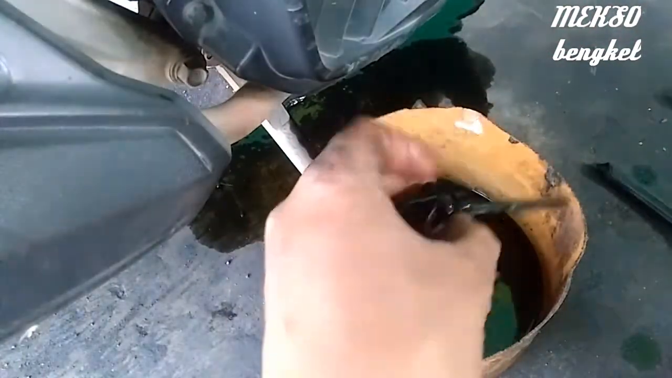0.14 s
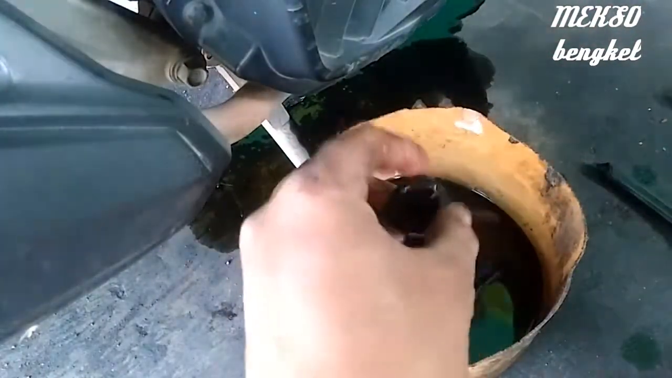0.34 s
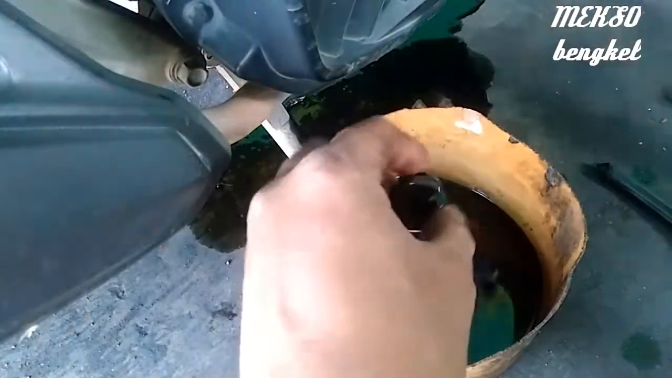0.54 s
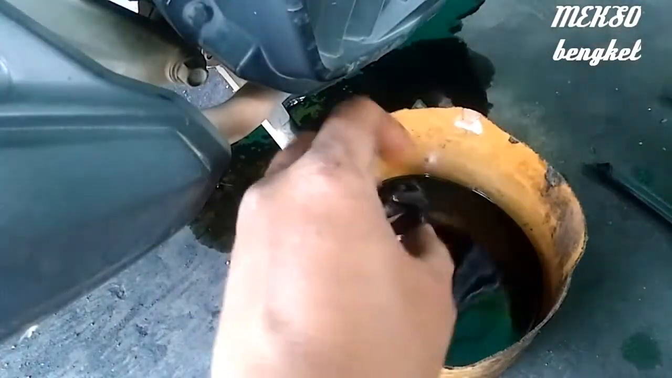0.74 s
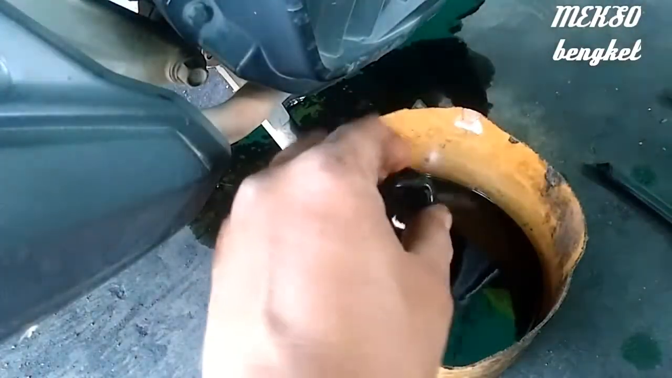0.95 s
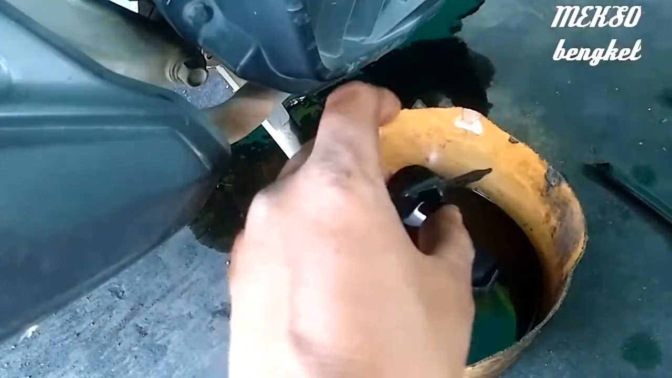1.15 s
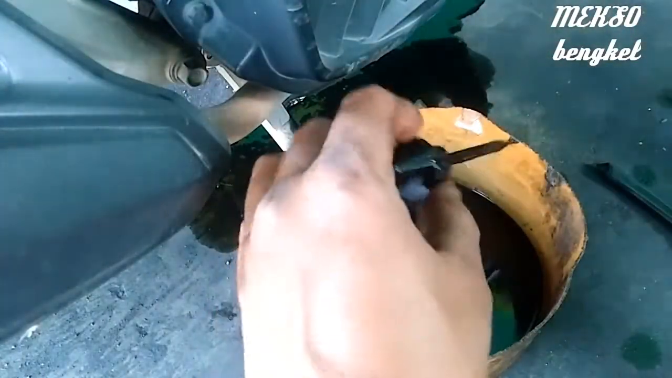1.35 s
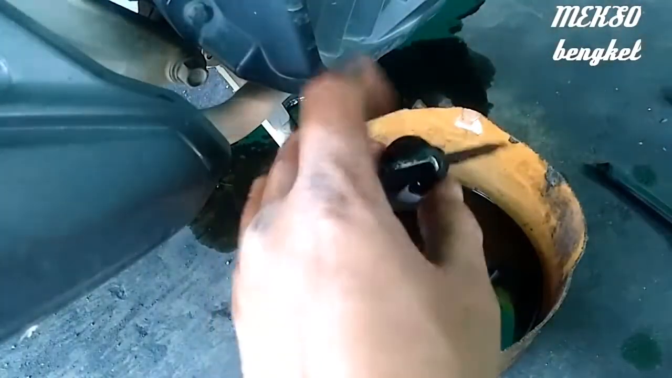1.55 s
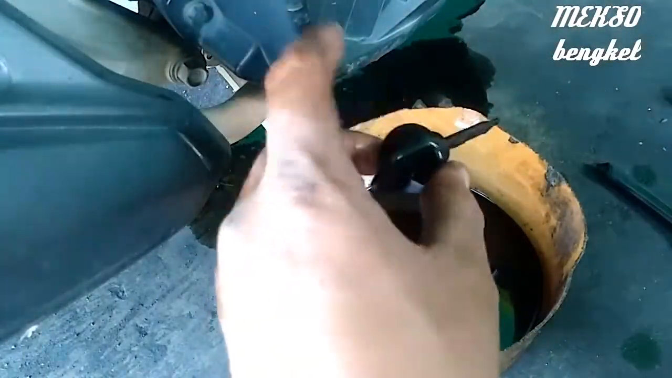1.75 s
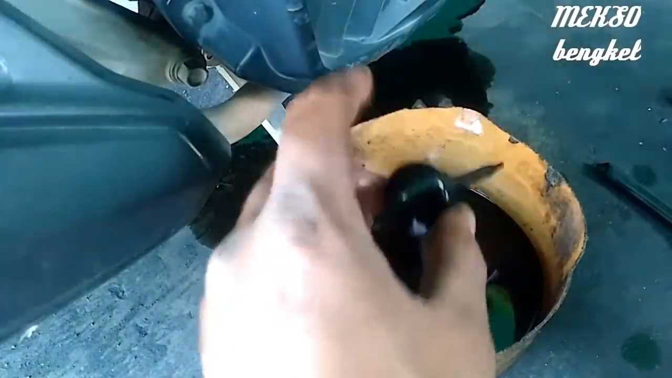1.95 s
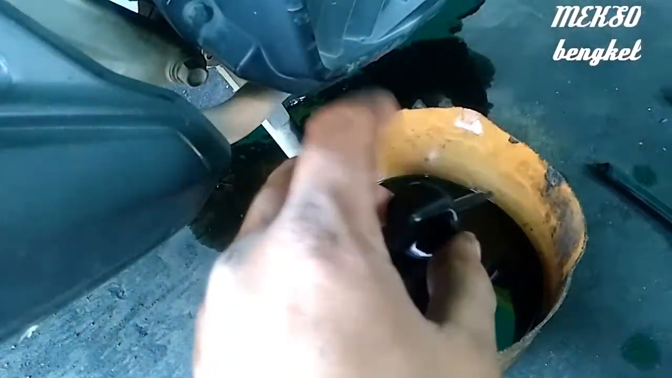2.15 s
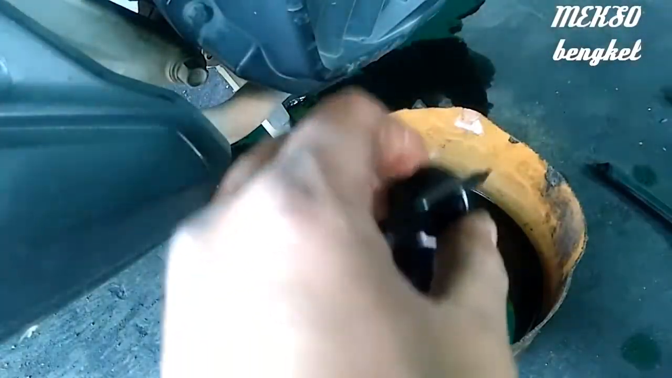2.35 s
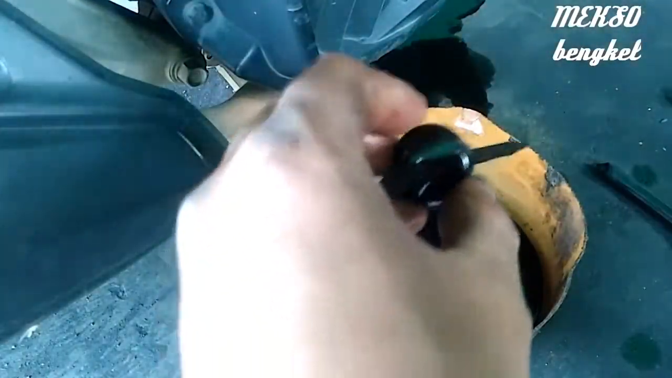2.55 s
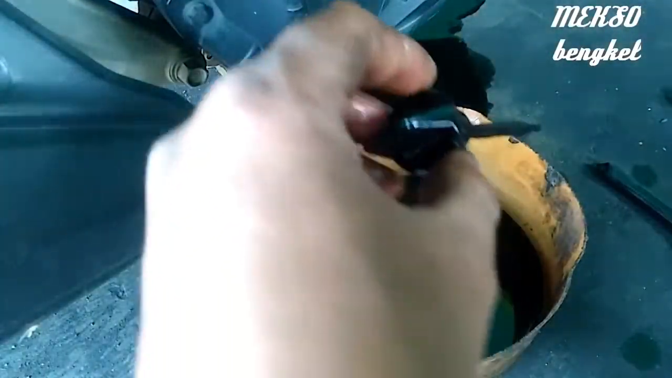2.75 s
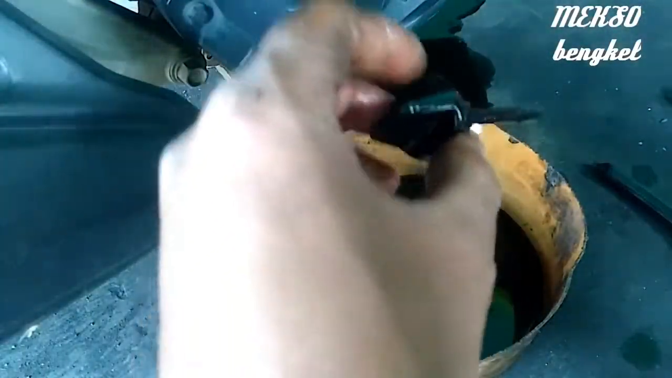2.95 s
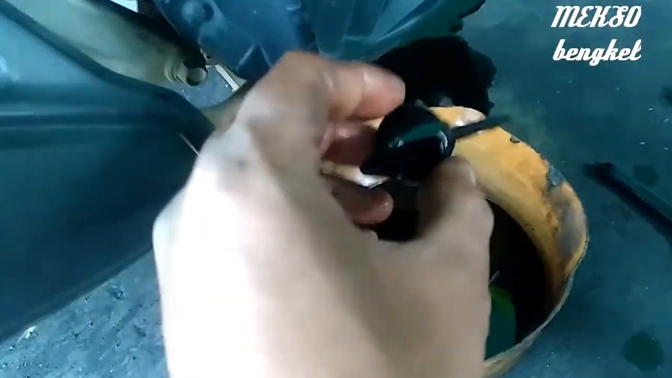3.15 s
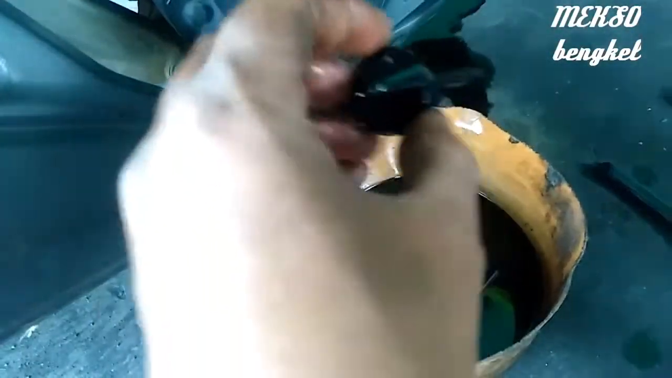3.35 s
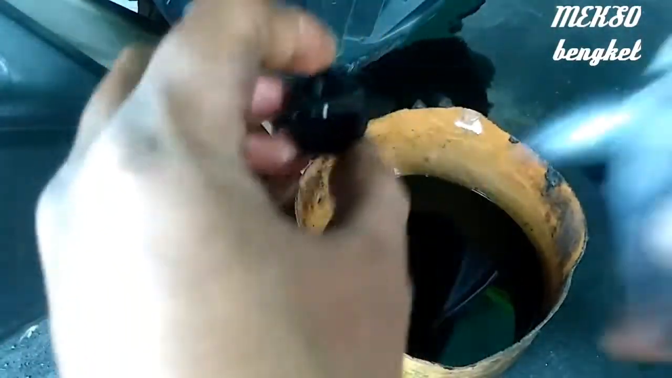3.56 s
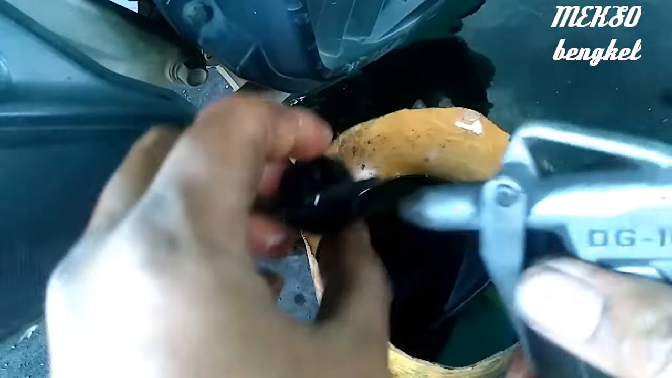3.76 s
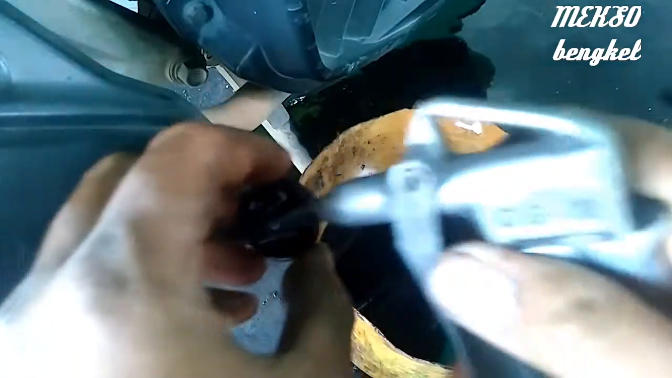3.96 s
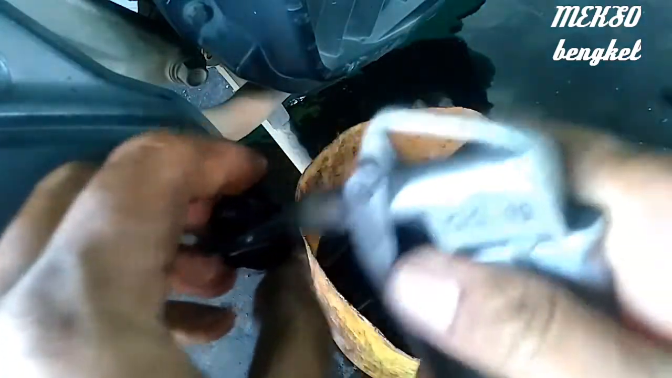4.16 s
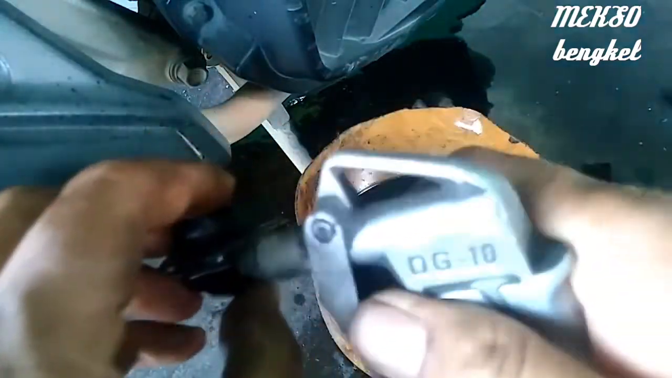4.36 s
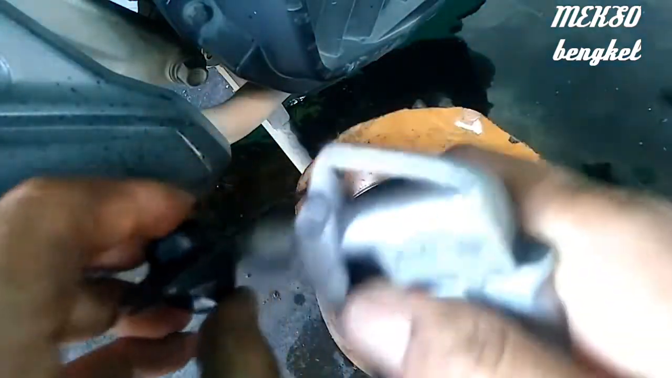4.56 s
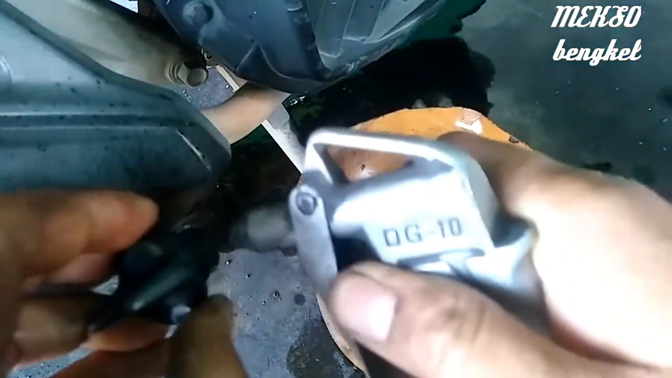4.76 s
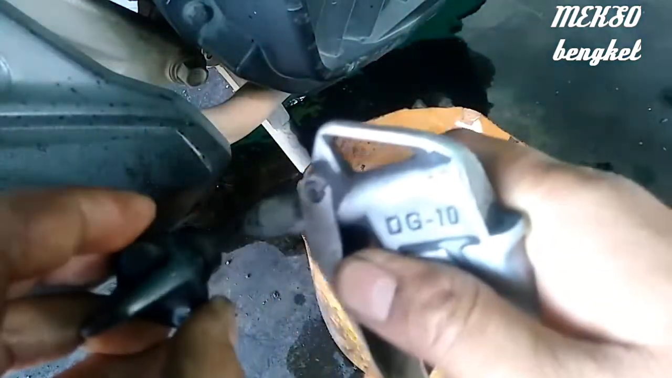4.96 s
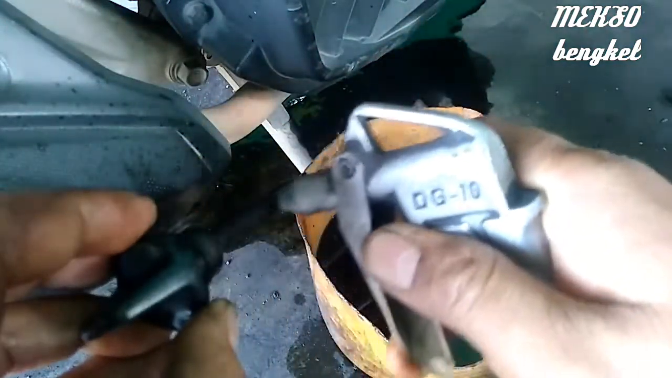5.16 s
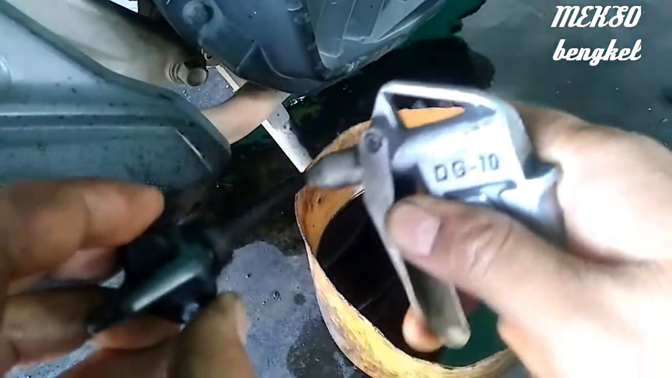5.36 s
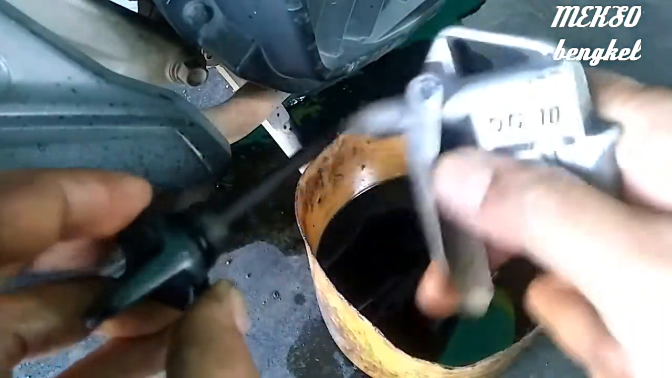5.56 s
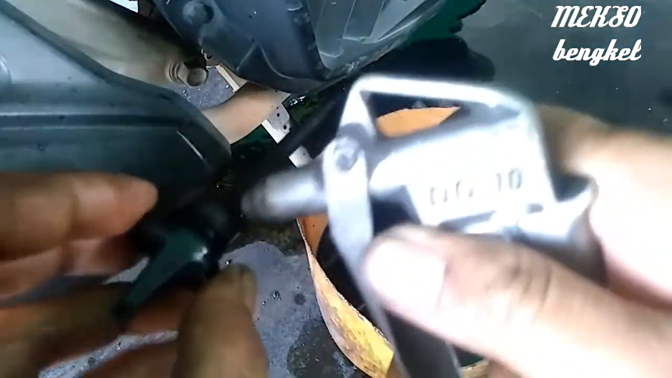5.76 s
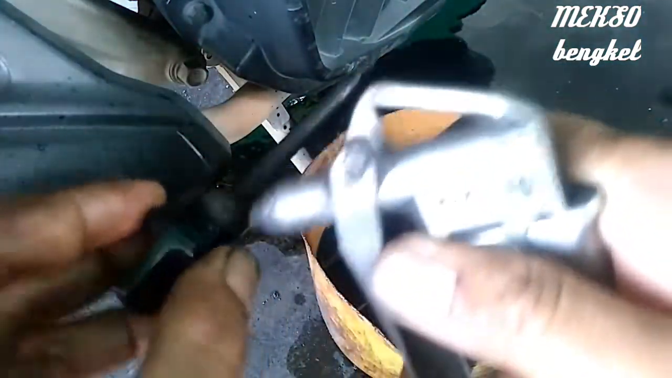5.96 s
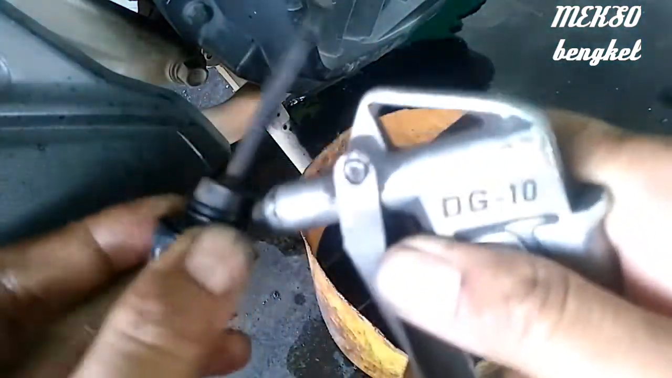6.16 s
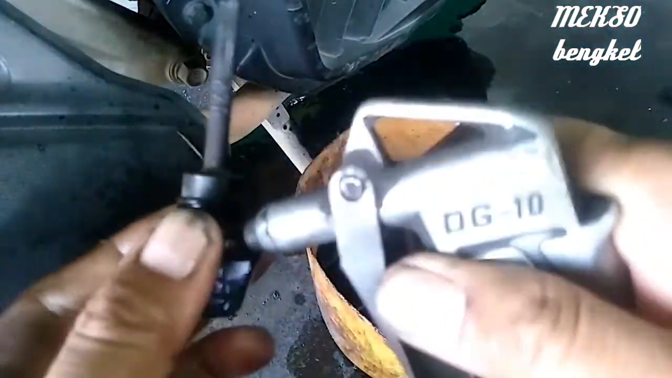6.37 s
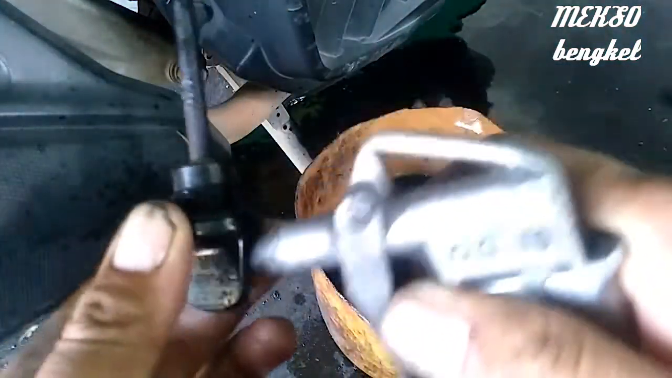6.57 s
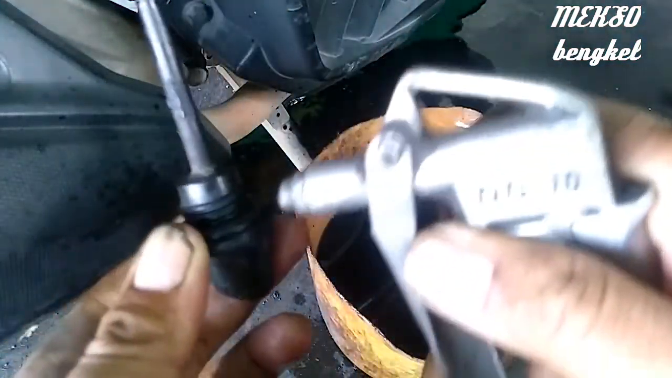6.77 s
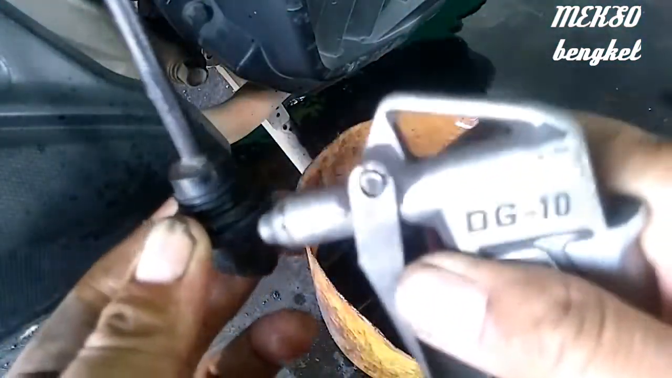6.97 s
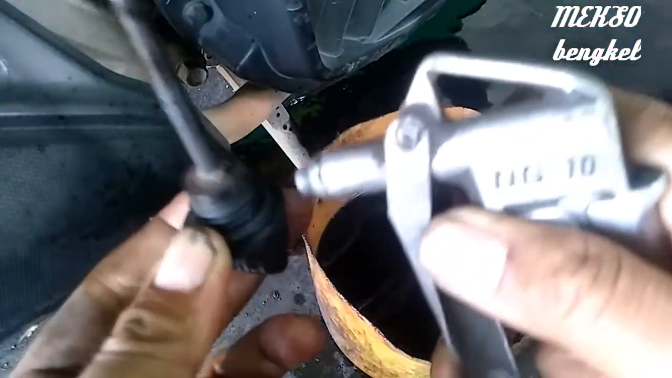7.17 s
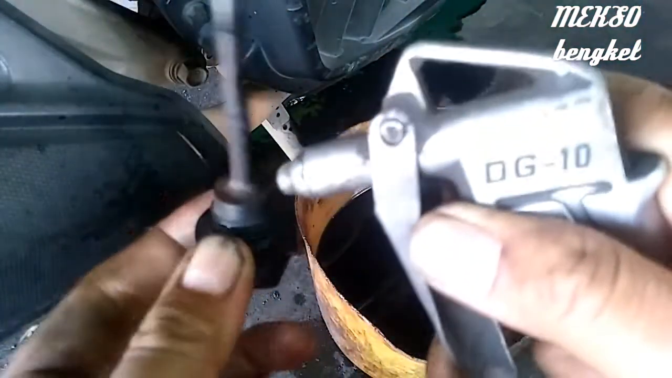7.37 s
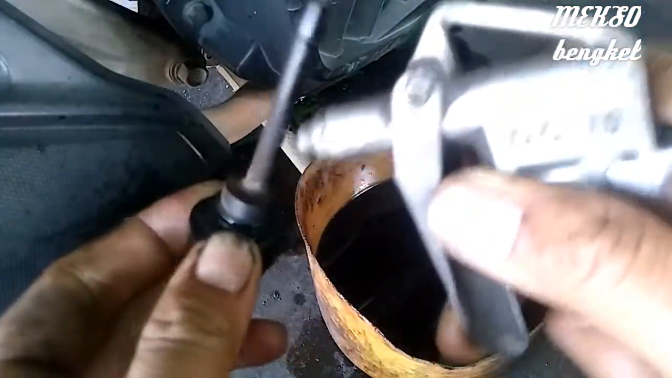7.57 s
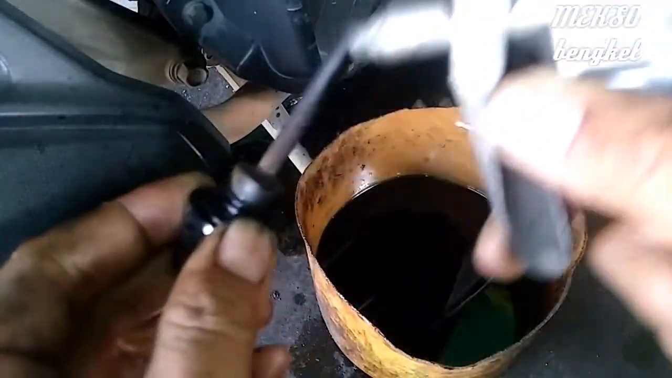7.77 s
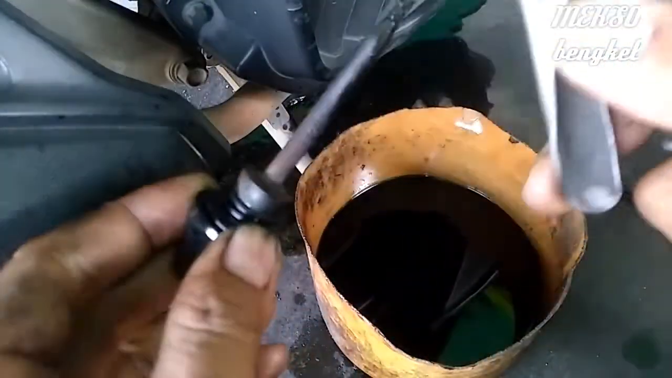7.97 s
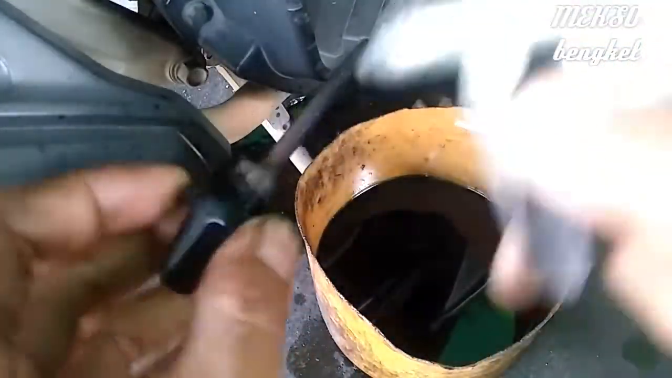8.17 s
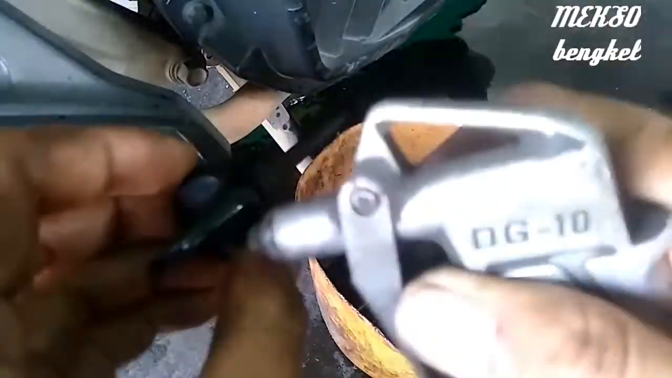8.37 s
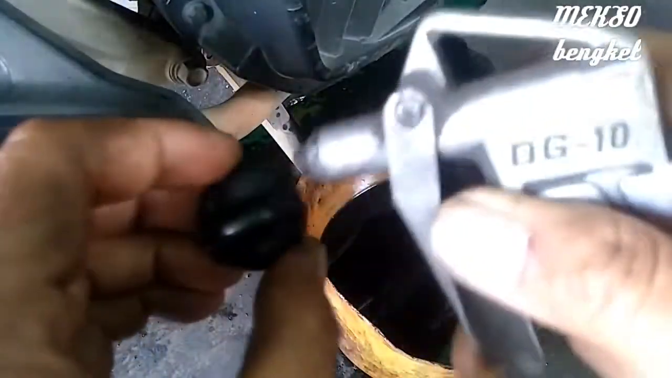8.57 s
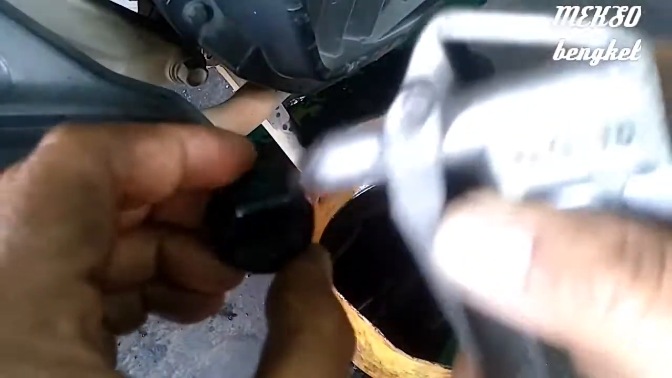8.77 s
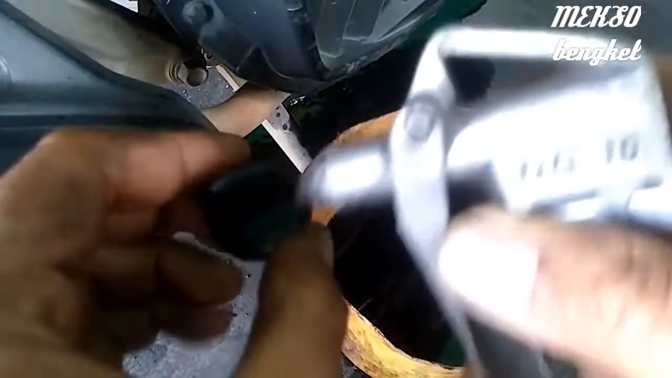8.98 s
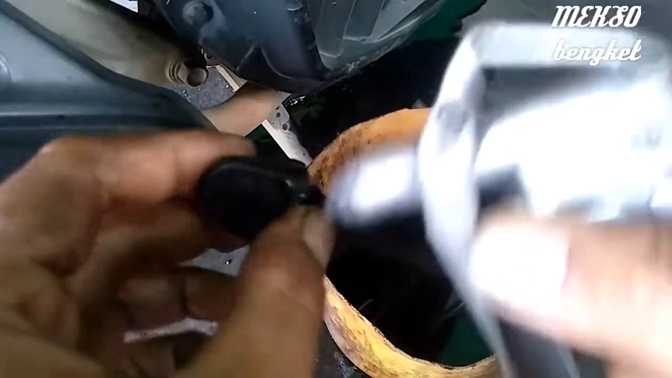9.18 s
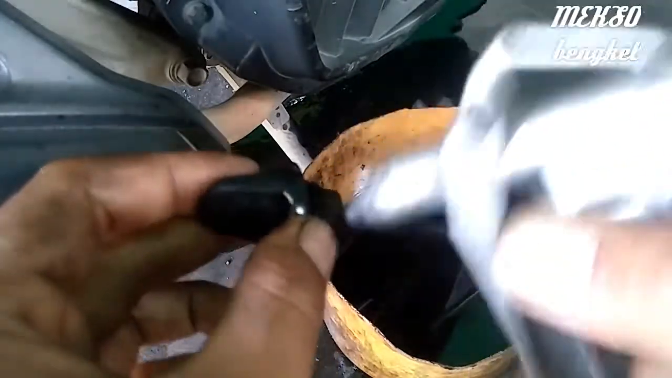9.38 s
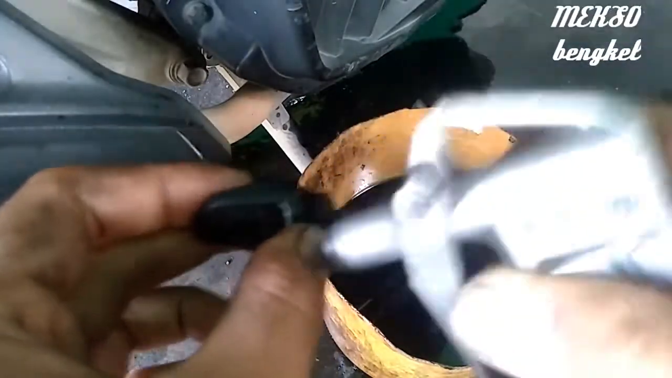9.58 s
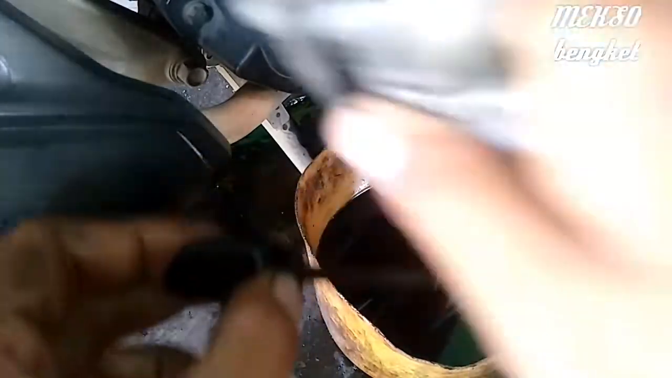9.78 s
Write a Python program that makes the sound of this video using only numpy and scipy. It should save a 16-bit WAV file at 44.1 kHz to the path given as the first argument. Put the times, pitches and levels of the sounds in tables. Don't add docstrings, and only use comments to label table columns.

```python
import sys
import numpy as np
from scipy import signal
from scipy.fft import rfft, irfft, next_fast_len
from scipy.io import wavfile
from scipy.ndimage import uniform_filter1d, map_coordinates

SR = 44100
rng = np.random.default_rng(int(sys.argv[2]) if len(sys.argv) > 2 else 0)


def wav_record(signal):
    frames = np.transpose(np.atleast_2d(signal))
    bounded = np.clip(frames, -1, 1)
    quanta = np.round(bounded * 32767).astype(np.int16)
    wavfile.write(sys.argv[1], SR, quanta)


def gain_from_decibels(decibels):
    exponent = np.asarray(decibels, float) / 20
    return 10 ** exponent


N = 433062

MONO_BELOW_HZ = 4230
# time the valve is fully open in seconds, time it is let go
# in seconds, level to which the stream then sinks in dB.
PULLS = [
    (3.947, 5.631, -27),
    (5.782, 8.432, -10.5),
    (8.517, 9.9, -8),
]


def rms_one(x):
    return x / np.sqrt(np.mean(x ** 2) + 1e-20)


def peak_one(x):
    return x / np.abs(x).max()


def in_time(rows):
    s, *columns = np.transpose(rows)
    return [np.interp(np.arange(N) / SR, s, column) for column in columns]


def drift(rate):
    coarse = 40
    r = np.exp(-2 * np.pi * coarse * rate / SR)
    noise = rng.standard_normal(N // coarse + 2002)
    slow = signal.lfilter([1], [1, -2 * r, r * r], noise)[2000:]
    return np.interp(np.arange(N) / coarse, np.arange(len(slow)), rms_one(slow))


def zoned_noise(colour, zones_hz, levels_db, side_db):
    size = next_fast_len(N)
    log_hz = np.log(np.fft.rfftfreq(size, 1 / SR) + 1)
    colour_hz, colour_db = np.transpose(colour)
    shape = gain_from_decibels(np.interp(log_hz, np.log(colour_hz), colour_db))
    noise = rfft(rng.standard_normal((2, size))) * shape
    out = 0
    for k, level_db in enumerate(levels_db):
        share = np.interp(log_hz, np.log(zones_hz), np.arange(len(zones_hz)) == k)
        zone = irfft(noise * share, size)[:, :N]
        out = out + gain_from_decibels(level_db) * rms_one(zone)
    mid, side = out[0], out[1] * gain_from_decibels(side_db)
    return np.array([mid + side, mid - side])


def street():
    # frequency in Hz, spectral density in dB per Hz.
    street_colour = [(18, -41), (30, -12), (66, -0.5), (91, 3.5), (222, -6.5), (286, -10.5), (342, -16.5),
                     (451, -16.5), (768, -23), (1280, -22.5), (2010, -28), (4200, -35.5), (6290, -42),
                     (8970, -31), (12800, -51), (16600, -77), (22000, -120)]
    street_zones_hz = [120, 400, 1500, 8500]
    # start in seconds, end in seconds, level in dB.
    rustles = [
        (-.1, 0.6, -47.5),
        (.915, 0.933, -39.5),
        (1.27, 1.34, -57),
        (2.648, 3.0, -63),
        (3.078, 3.097, -48),
    ]
    rustle_zones_db = [2, -17, -9, -1]
    # level in each zone, in dB.
    wake_db = [-35.5, -36, -48, -57]
    quiet_db, swell_db = [-47, -56, -59, -59.5], [1.3, 17.5, 15.3, 13.7]
    rustle_fade_db_per_s = 120

    t = np.arange(N) / SR
    near = np.interp(t, [1.67, 4.5], [0, 1])
    blown = t > PULLS[0][0]
    rustle = 0
    for start, end, db in rustles:
        outside_s = np.maximum(0, np.maximum(start - t, t - end))
        rustle = rustle + gain_from_decibels(db - rustle_fade_db_per_s * outside_s)
    flutter = [1.2 * drift(5), 1.8 * drift(6), 0.6 * drift(3), 1.6 * drift(15)]
    levels = []
    for quiet, swell, hand, wake, own in zip(quiet_db, swell_db, rustle_zones_db, wake_db, flutter):
        power = gain_from_decibels(2 * (quiet + swell * near)) + (gain_from_decibels(hand) * rustle) ** 2 + gain_from_decibels(2 * wake) * blown
        levels.append(own + 10 * np.log10(power))
    return zoned_noise(street_colour, street_zones_hz, levels, side_db=-1.5)


def patches(pair, depth_db, alike_share, patch_hz, patch_s):
    middle_side = np.array([pair[0] + pair[1], pair[0] - pair[1]]) / 2
    hz, t, (mid, side) = signal.stft(middle_side, SR, nperseg=512)
    where = np.meshgrid(hz / patch_hz, t / patch_s, indexing="ij")
    gain, chance = (map_coordinates(rng.standard_normal((60, 900)), where, order=0, mode="wrap")
                    for _ in range(2))
    common = np.interp(t / patch_s, np.arange(900), rng.standard_normal(900))
    chance = .8 * chance + .6 * common
    is_alike = chance > np.quantile(chance, 1 - np.clip(alike_share, 0, 1))
    alike = np.where(is_alike, .92, .03) * (hz[:, None] > MONO_BELOW_HZ)
    cells = gain_from_decibels(depth_db * gain) * np.array([mid * np.sqrt(1 + alike), side * np.sqrt(1 - alike)])
    mid, side = signal.istft(cells, SR, nperseg=512)[1][:, :N]
    return np.array([mid + side, mid - side])


def burst(s, t60):
    t = np.arange(4 * SR) / SR - s
    return rng.standard_normal(len(t)) * gain_from_decibels(-60 * np.clip(t / t60, 0, 5)) * (t >= 0)


def resonance(x, hz, width):
    r = np.exp(-np.pi * width / SR)
    poles = [1, -2 * r * np.cos(2 * np.pi * hz / SR), r * r]
    return signal.lfilter([(1 - r * r) / 2, 0, (r * r - 1) / 2], poles, x)


def ticks():
    # start in seconds, peak level in dB, resonance in Hz, decay time t60 in seconds.
    contacts = [
        (0.016, -20.5, 397, 0.022),
        (.89, -42, 2500, 0.13),
        (1.196, -27, 3700, 0.019),
        (1.3, -40, 3500, 0.24),
        (1.6591, -35, 2800, 0.074),
        (1.886, -23, 2740, 0.023),
        (2.8, -39, 7000, .1),
        (3.2969, -31, 8200, .02),
        (3.852, -23.5, 1900, .015),
    ]
    out = np.zeros(N)
    for s, db, hz, t60 in contacts:
        shake = signal.lfilter([.4], [1, -.6], burst(s, t60))
        broad = 0.9 * min(hz / 3000, 1) * shake
        ring = 2 * resonance(shake, hz, 0.23 * hz)
        out[:len(shake)] += gain_from_decibels(db) * peak_one(broad + ring)
    return out


def knocks():
    # start in seconds, crack level in dB, crack t60 in seconds, body level in dB, body t60 in seconds.
    blows = [
        (0.031, 3.5, 0.028, -6.5, 0.087),
        (0.5193, -5, 0.015, -12.5, 0.12),
        (0.9154, -20.5, 0.22, -7.5, 0.19),
    ]
    # frequency in Hz, width in Hz, level in dB.
    bodies = [
        [(540, 400, -5), (1074, 190, 7), (1440, 240, 5), (1940, 400, -5), (2380, 210, -8), (4200, 1500, -4),
         (8700, 1800, -19)],
        [(300, 300, -7), (660, 250, -5), (910, 400, 2), (1740, 180, 0.5), (2800, 500, -4), (4350, 1800, -1.5),
         (9250, 1200, -1.5)],
        [(114, 30, -2), (219, 120, 7), (310, 50, 3), (412, 67, 1.5), (890, 400, -44), (2350, 700, -33)],
    ]
    crack_hz = [1710, 3200, 1100]
    out = np.zeros(N)
    for (s, crack_db, crack_t60, body_db, body_t60), hz, body in zip(blows, crack_hz, bodies):
        crack = resonance(burst(s, crack_t60), hz, 0.69 * hz)
        rattle = burst(s, body_t60)
        ringing = 0
        for f, width, db in body:
            mode = resonance(resonance(rattle, f, width), f, width)
            ringing = ringing + gain_from_decibels(db) * mode / np.sqrt(width)
        out[:len(crack)] += gain_from_decibels(crack_db) * peak_one(crack) + gain_from_decibels(body_db) * peak_one(ringing)
    return out


def workshop(x, t60, dull_hz):
    t = np.arange(int(.6 * SR)) / SR
    tail = rng.standard_normal((2, len(t))) * gain_from_decibels(-60 * t / t60) * (t > .006)
    tail = signal.sosfilt(signal.butter(1, dull_hz, fs=SR, output="sos"), tail)
    tail = tail / np.sqrt(np.sum(tail ** 2) / 2)
    return signal.oaconvolve(x[None], tail, axes=1)[:, :N]


def drone():
    # centre in seconds, level in dB, half length in seconds.
    swells = [(.08, -54, .1), (.46, -33.5, 0.15), (.97, -41, 0.12), (1.39, -47, 0.21), (1.85, -37.5, 0.053),
              (2.197, -42, 0.078), (2.97, -46, .07), (3.35, -38, .2), (3.83, -52, .05)]
    t = np.arange(N) / SR
    level = gain_from_decibels(-57)
    for s, db, half in swells:
        level = level + gain_from_decibels(db - 1.5) * np.exp(-((t - s) / half) ** 2)
    noise = rng.standard_normal(N)
    return level * rms_one(resonance(resonance(noise, 75, 12), 75, 12))


def motorbike():
    # time in seconds, level in dB.
    approach = [(1.2, -62), (2.0, -53), (2.2, -47), (3.0, -43), (3.4, -37.5), (3.65, -41), (3.87, -33.5),
                (4.1, -38), (5.0, -46)]
    # multiple of the firing rate, level in dB.
    exhaust = [(2, -9), (3, -6), (4, 0), (5, -11), (6, -6), (7, -6), (8, -11), (9, -9), (10, -13),
               (11, -23)]
    firings_per_s, slows_per_s2, brakes_s = 36.4, 2.77, 1.8
    t = np.arange(N) / SR
    level_db, = in_time(approach)
    per_s = firings_per_s - slows_per_s2 * np.clip(t - brakes_s, 0, 2.5)
    phase = 2 * np.pi * np.cumsum(per_s * (1 + .002 * drift(6))) / SR
    hum = 0
    for k, db in exhaust:
        hum = hum + gain_from_decibels(db + 1.8 * drift(4)) * np.sin(k * phase + 2 * np.pi * rng.random())
    return gain_from_decibels(level_db) * hum * (t > approach[0][0])


def bird_tones(calls, spread_hz, starts_at):
    out = np.zeros(N)
    for s, length, top_hz, end_hz, db in calls:
        u = np.linspace(0, 1, int(length * SR))
        noises = rng.standard_normal((2, len(u)))
        grit, waver = (rms_one(uniform_filter1d(row, size=150)) for row in noises)
        hz = np.interp(u, [0, .35, 1], [starts_at * top_hz, top_hz, end_hz]) + spread_hz * waver
        swell = np.sin(np.pi * u) ** 0.16 * (1 + .6 * grit)
        start = int(s * SR)
        tone = gain_from_decibels(db + 2.5) * swell * np.sin(2 * np.pi * np.cumsum(hz) / SR)
        out[start:start + len(u)] += tone[:N - start]
    return out


def far_whistles():
    # start in seconds, length in seconds, first pitch in Hz, end pitch in Hz, level in dB.
    whistle_calls = [(1.28, .3, 2290, 2310, -63), (1.28, 0.27, 2700, 2710, -64),
                     (1.33, 0.22, 1610, 1610, -64), (1.62, .18, 3520, 3420, -63),
                     (1.82, .36, 4760, 4560, -64), (2.55, .37, 4900, 4880, -67),
                     (3.12, .1, 4650, 4800, -66), (1.7, .1, 2800, 2900, -66),
                     (3.06, 0.046, 3700, 3650, -59), (2.24, .1, 4300, 4230, -62),
                     (2.9, .09, 4300, 4200, -62), (2.3, .3, 2000, 1980, -64), (1.57, .08, 3980, 4060, -60)]
    return bird_tones(whistle_calls, spread_hz=30, starts_at=1)


def sparrows():
    # start in seconds, length in seconds, top pitch in Hz, end pitch in Hz, level in dB.
    chirp_calls = [
        (1.565, 0.034, 4680, 4050, -51),
        (1.595, 0.036, 3400, 3050, -55),
        (2.188, 0.059, 5000, 3020, -49.5),
        (2.415, .045, 4700, 3560, -60),
        (2.865, 0.035, 4850, 4000, -47.5),
        (3.735, 0.025, 4950, 3850, -48),
    ]
    return bird_tones(chirp_calls, spread_hz=230, starts_at=.84)


def valve(lag_s, open_db_per_s, close_db_per_s, lowest_db):
    t = np.arange(N) / SR
    flows = []
    for (s, shut, _), lag, opens, closes, low in zip(PULLS, lag_s, open_db_per_s, close_db_per_s, lowest_db):
        rise = np.minimum(0, opens * (t - s - lag))
        fall = np.maximum(-closes * (t - shut), low)
        flows.append(np.minimum(rise, fall))
    return np.max(flows, axis=0)


def jet():
    # frequency in Hz, spectral density in dB per Hz.
    jet_colour = [(24, -50), (40, -18), (75, -19.5), (334, -12), (436, -10.5), (707, -10.5), (3920, -10.5),
                  (4990, -15.5), (6510, -13), (8910, -0.5), (9570, -2), (12800, -6), (16600, -4),
                  (22000, -120)]
    jet_zones_hz = [1500, 3800, 6300, 9000, 11800]
    # time in seconds, core level in dB, strike on the part in dB.
    aim = [(3.95, -10, 0.5), (4.35, -9.5, 0), (4.6, -10, 1.5), (5.0, -10.5, -2.5), (5.27, -9, -0.5),
           (5.6, -10, -2), (5.8, -9.5, 1), (6.1, -11.5, -1), (6.4, -9.5, 0.5), (6.7, -9.5, 0.5),
           (7.15, -10, 2.5), (7.5, -12, -0.5), (8.0, -11, 0.5), (8.4, -10, 0), (8.53, -8.5, 3),
           (8.6, -10, 0), (9.1, -9, 0.5), (9.82, -10, -0.5)]
    rasp_lag_s = [0.012, 0.01, -0.0094]
    rasp_db, rush_db, part_db, top_db = -20, -20.5, -16, -15.5
    part_sinks, top_sinks = 0.87, 1.05
    full_core_db = -7

    core_db, strike_db = in_time(aim)
    sinks = np.array(PULLS)[:, 2]
    flow = valve([0, 0, 0], [3000, 1500, 650], [315, 650, 500], sinks)
    rasp = valve(rasp_lag_s, [1500, 1500, 1500], [800, 700, 800], -22 + 0.32 * sinks)
    waver = 0.87 * drift(22)
    core_db = core_db + waver
    levels = [
        rasp_db + rasp - 0.086 * waver + .5 * drift(6),
        rush_db + 0.41 * rasp + 0.46 * flow - 0.13 * waver + 0.95 * drift(4.6),
        part_db + strike_db + part_sinks * flow + 0.13 * rasp - .3 * waver + 1.2 * drift(15),
        core_db + 1.33 + flow,
        top_db + .4 * strike_db + top_sinks * flow - .5 * waver + 1.1 * drift(25)]
    unshared = np.clip(gain_from_decibels(2 * (full_core_db - core_db)) - 1, .2, 1.15)
    return zoned_noise(jet_colour, jet_zones_hz, levels, side_db=10 * np.log10(unshared))


def wind_puff():
    s, length, db = 8.428, 0.022, -20
    band = signal.butter(2, [40, 450], "band", fs=SR, output="sos")
    low = signal.sosfilt(band, rng.standard_normal(N))
    return gain_from_decibels(db) * rms_one(low) * np.exp(-((np.arange(N) / SR - s) / length) ** 2)


def scene():
    blunt = signal.butter(4, 10000, fs=SR, output="sos")
    near = signal.sosfilt(blunt, knocks() + ticks())
    far = far_whistles() + sparrows()
    echoes = gain_from_decibels(-15.5) * workshop(near, 0.52, 4700) + gain_from_decibels(-7) * workshop(far, 0.18, 8000)
    road = patches(street(), depth_db=-0.66, alike_share=.3, patch_hz=872, patch_s=0.045)
    air = patches(jet(), depth_db=1.3, alike_share=.2, patch_hz=900, patch_s=.03)
    return near + far + echoes + motorbike() + drone() + road + air + wind_puff()


def low_pass(x):
    return signal.sosfilt(signal.butter(12, 15720, fs=SR, output="sos"), x)


def record(dry):
    left, right = 1.324 * np.tanh(dry / 1.427)
    treble = signal.ellip(8, .3, 60, MONO_BELOW_HZ, "high", fs=SR, output="sos")
    side = signal.sosfilt(treble, (left - right) / 2)
    pair = (left + right) / 2 + side * [[1], [-1]]
    top_cut = signal.ellip(12, .3, 90, 13020, fs=SR, output="sos")
    mix = np.clip(signal.sosfilt(top_cut, pair), -1, 1)
    return low_pass(mix)


dry = scene()
out = record(dry)
wav_record(out)
```